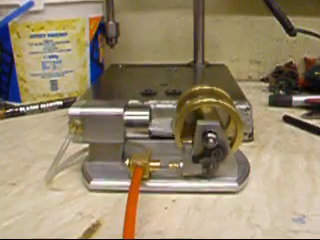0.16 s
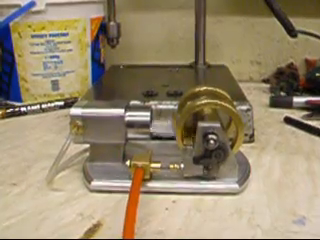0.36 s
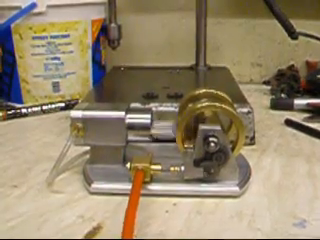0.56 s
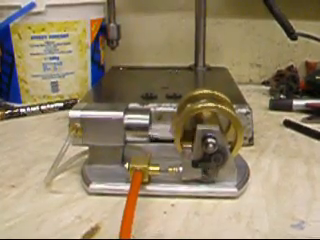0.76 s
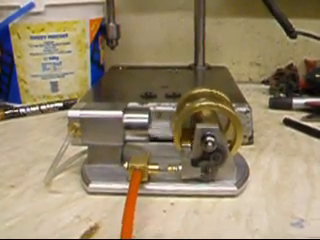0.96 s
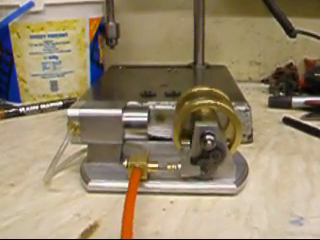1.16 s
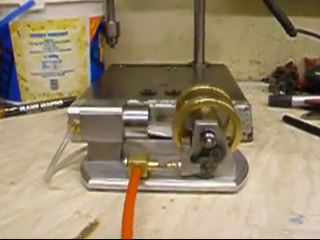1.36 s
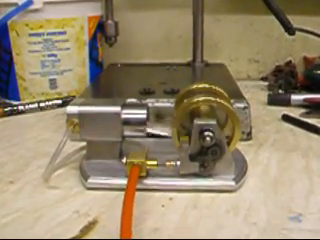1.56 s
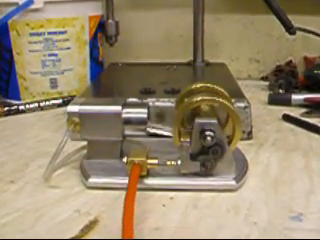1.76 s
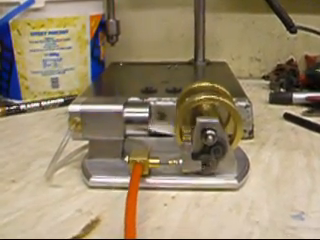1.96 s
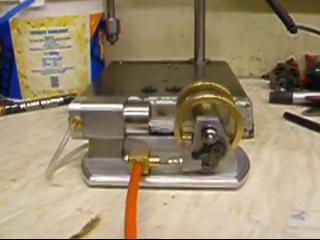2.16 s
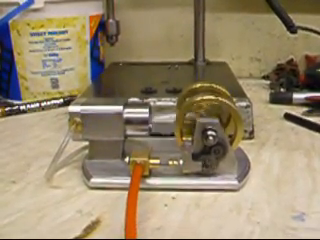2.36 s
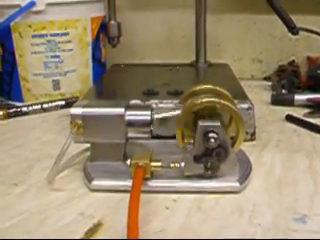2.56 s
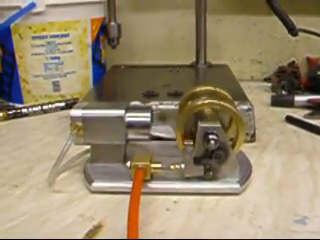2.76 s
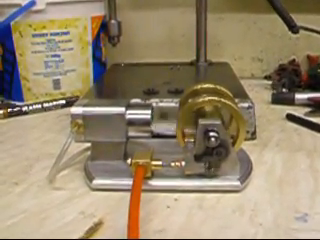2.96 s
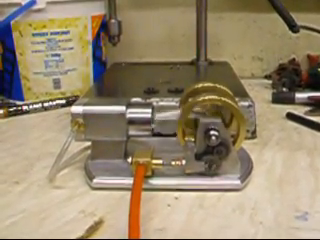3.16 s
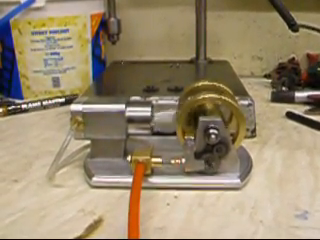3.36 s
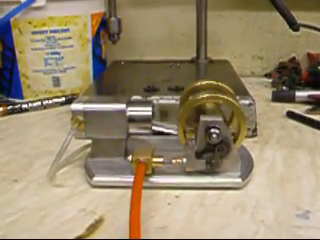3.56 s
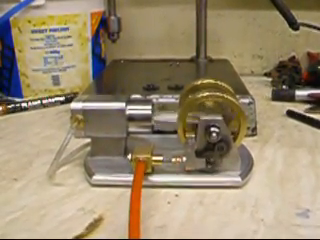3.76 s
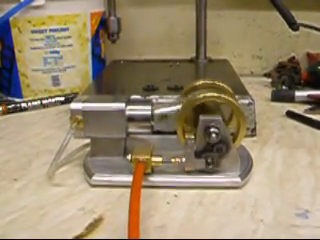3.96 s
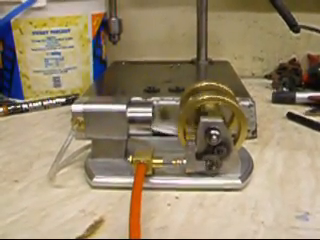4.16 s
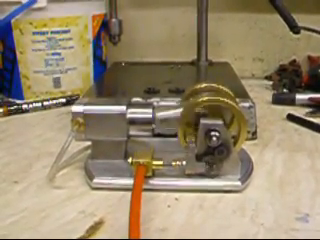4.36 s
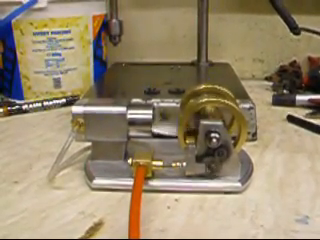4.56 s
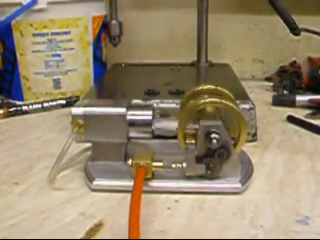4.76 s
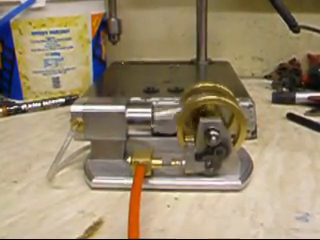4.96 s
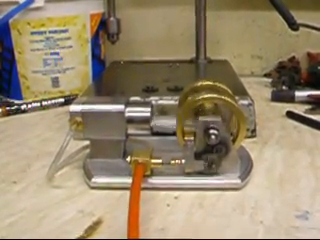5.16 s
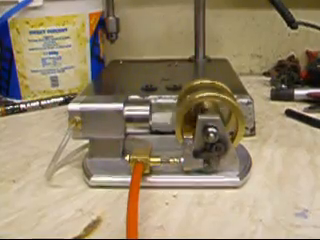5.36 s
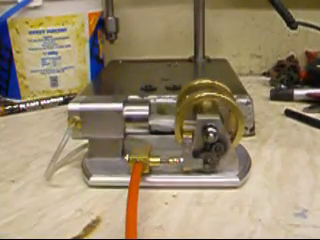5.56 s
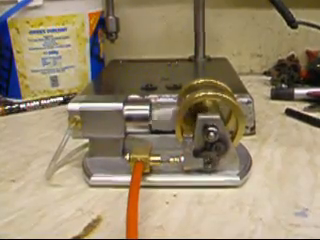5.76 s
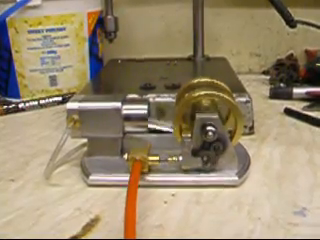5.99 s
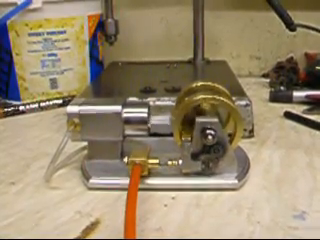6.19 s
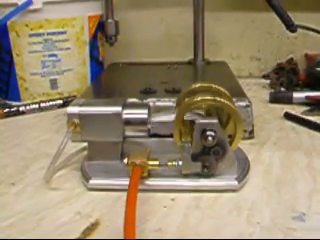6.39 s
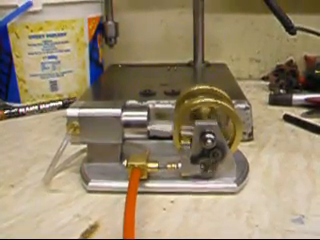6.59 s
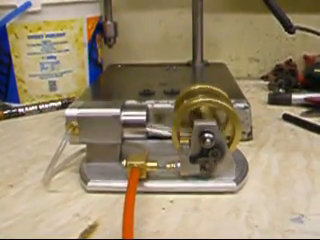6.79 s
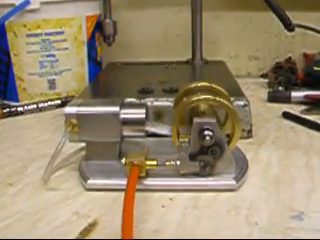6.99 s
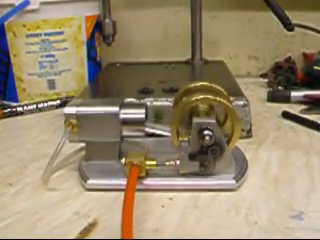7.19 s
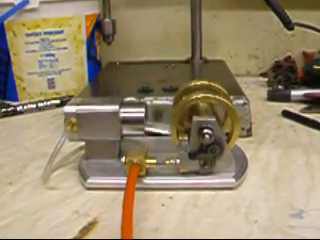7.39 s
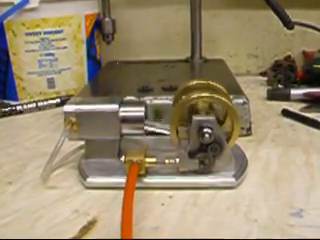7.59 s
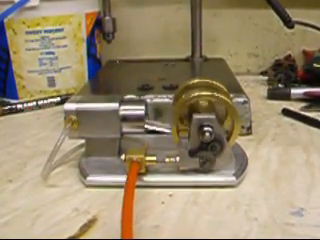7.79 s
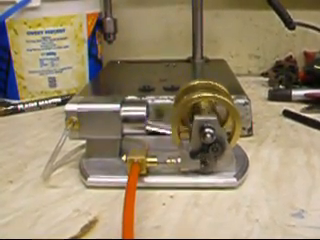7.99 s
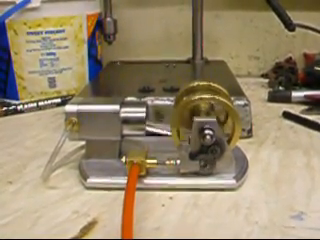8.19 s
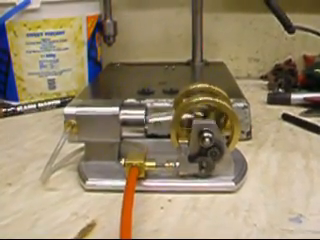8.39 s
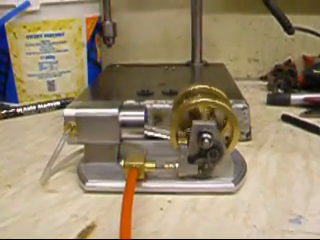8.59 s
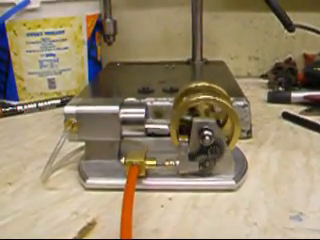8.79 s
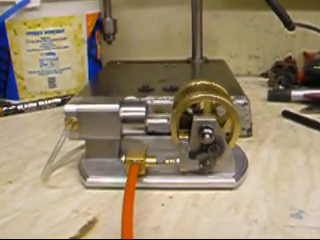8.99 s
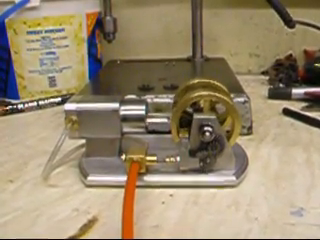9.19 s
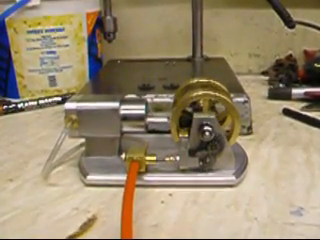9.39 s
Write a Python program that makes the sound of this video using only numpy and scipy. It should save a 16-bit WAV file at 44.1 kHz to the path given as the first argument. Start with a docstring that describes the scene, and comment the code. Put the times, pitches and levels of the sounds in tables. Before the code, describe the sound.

Close to the microphone, a little air-powered engine chuffs in a quick, regular train of crisp puffs with a short workshop echo. The piston slides softly between beats and the valve adds tiny chirps. The puffs grow slower, longer and slightly hollower as the flywheel winds down, then cease. Only the steady, faint hiss of leaking air remains, with quiet room rumble and a barely audible hum.

```python
"""On a workshop bench, a small single-cylinder model engine runs on compressed air, slows down and stops.
Once a turn the valve dumps the cylinder through a resonant exhaust tube: a sharp, spitting puff,
often closed by a tiny squeak. Between puffs the piston swishes in its bore. A small leak hisses
throughout, over a low murmur and a faint mains hum, and carries on after the flywheel has stopped."""
import sys
import numpy as np
from scipy import signal
from scipy.fft import rfft, irfft, next_fast_len
from scipy.io import wavfile
from scipy.ndimage import map_coordinates

SR = 44100
rng = np.random.default_rng(int(sys.argv[2]) if len(sys.argv) > 2 else 0)


def waveform_to_disk(signal):
    """Save audio, clipped to [-1, 1], as 16-bit WAV at the path in sys.argv[1]."""
    frames = np.transpose(np.atleast_2d(signal))
    scaled = np.clip(frames, -1, 1) * 32767
    samples = np.round(scaled).astype(np.int16)
    wavfile.write(sys.argv[1], SR, samples)


N = 416304

# Exhaust puffs, one a turn, each a burst on top of a steady flow: start_s, flow_db, burst_db
PUFFS = [(0.0851, -26, 6), (0.2832, -22.5, -0.1), (0.4831, -25, 5.5), (0.6829, -23, 0.2), (0.8842, -27, 6),
         (1.0846, -21, 0.5), (1.2907, -24.5, 5), (1.4964, -21.9, 1.2), (1.6991, -25, 7.5),
         (1.9075, -22, 3.0), (2.1174, -27.5, 8), (2.335, -23.0, 1.5), (2.5548, -24, 3.1), (2.7875, -25, 5),
         (3.0152, -25, 4.2), (3.2436, -22, 0.2), (3.4746, -24, 3), (3.7157, -25, 4.5), (3.9526, -25, 4),
         (4.2025, -25, 5), (4.4465, -24.5, 4.5), (4.7007, -24.1, 2), (4.9512, -25.5, 6.5),
         (5.2158, -23.5, 3), (5.479, -24.5, 4.5), (5.7542, -22.5, 3.0), (6.0194, -26, 7),
         (6.3166, -24, 1.1), (6.6324, -27, 5.5), (7.0085, -23, 1), (7.3834, -27, 6.5), (7.7926, -24, 4),
         (8.1724, -28.5, 9.5)]
OPEN_S, TURN_S = .0531, .25  # the valve stays open OPEN_S in a turn lasting TURN_S


def amp(db):
    """Decibels to gain."""
    return 10 ** (np.asarray(db) / 20)


def unit(x):
    """Scaled to rms 1."""
    return x / np.sqrt(np.mean(x ** 2) + 1e-20)


def along(points, hz):
    """A curve through (frequency, value) points on a log frequency axis."""
    f, v = np.transpose(points)
    return np.interp(np.log(hz + 1), np.log(f + 1), v)


def peaks(resonances, hz):
    """The boost in dB that resonances add to a colour."""
    return sum(db / (1 + (2 * (hz - centre) / width) ** 2) for centre, width, db in resonances)


def filtered(x, response):
    """x equalised by a gain curve over frequency."""
    size = next_fast_len(N + SR // 2)
    return irfft(rfft(x, size) * response(np.fft.rfftfreq(size, 1 / SR)), size)[:N]


def noise(colour, resonances=()):
    """Coloured noise of rms 1."""
    white = rng.standard_normal(N)
    return unit(filtered(white, lambda hz: amp(along(colour, hz) + peaks(resonances, hz))))


def wobble(rate):
    """A smooth random curve, rate knots a second."""
    return map_coordinates(rng.standard_normal(int(N * rate / SR) + 4), [np.arange(N) * rate / SR])


def ringing(colour_db, size=8192):
    """Minimum-phase impulse response of energy 1 with the given colour."""
    cepstrum = irfft(np.log(amp(colour_db(np.fft.rfftfreq(size, 1 / SR)))))
    cepstrum[1:size // 2] *= 2
    cepstrum[size // 2 + 1:] = 0
    response = irfft(np.exp(rfft(cepstrum)))
    return response / np.linalg.norm(response)


def add(track, at_s, sound):
    """Mixes a sound into a track."""
    at = round(at_s * SR)
    track[at:at + len(sound)] += sound[:len(track) - at]


def valve_times(slow_power=.745):
    """When the valve opens and for how many seconds: longer as the flywheel slows."""
    starts = np.array(PUFFS)[:, 0]
    return starts, OPEN_S * (np.gradient(starts) / TURN_S) ** slow_power


def latest_puff():
    """For every sample: the number of the latest puff, and the seconds since its valve opened."""
    starts, t = np.array(PUFFS)[:, 0], np.arange(N) / SR
    number = np.maximum(np.searchsorted(starts, t) - 1, 0)
    return number, np.maximum(t - starts[number], 0)


def leak(level_db=-51):
    """Air slips past the valve in a steady, faintly whistling hiss."""
    # Colour of the hiss: frequency_hz, level_db
    hiss_colour = [(300, -5), (1000, -6.5), (2000, -5), (2800, -5), (3400, -7), (4000, -4.5), (4400, -5.5),
                   (5200, -7), (8000, -8), (10000, -15.5), (12600, -20.5), (13400, -44)]
    # Narrow resonances of the leak: pitch_hz, width_hz, boost_db
    whistles = [(2235, 120, 5.5), (3434, 150, 9), (3670, 64, 5.5), (4570, 180, 6), (5550, 12, 9),
                (5850, 200, 3)]
    return amp(level_db) * noise(hiss_colour, whistles)


def room_tone(murmur_db=-61, hum_db=-73, hum_hz=60):
    """The low murmur of the workshop and a faint mains hum."""
    # Colour of the murmur: frequency_hz, level_db
    murmur_colour = [(20, 3.5), (35, -12), (70, -13), (130, -7), (250, -12), (600, -10.5), (1500, -13.5),
                     (4000, -49)]
    hum = np.sin(2 * np.pi * hum_hz * np.arange(N) / SR)
    return amp(murmur_db) * noise(murmur_colour) + amp(hum_db) * hum


def piston(speed_power=2.1):
    """The piston slides in its bore: swishes tied to the crank angle, fading as the flywheel slows."""
    # Swishes in the turn after the valve opens: phase_turns, width_turns, full_speed_db, bright_share
    strokes = [(.34, 0.047, -40.5, 0.68), (0.551, 0.063, -46.5, 0.05), (.845, 0.053, -45.5, 0.45)]
    # Colour of a dull swish: frequency_hz, level_db
    dull_colour = [(400, -46), (1500, -9), (3600, 5.5), (4600, 7), (5400, -20), (12000, -28)]
    # Colour of a bright swish: frequency_hz, level_db
    bright_colour = [(400, -31), (1500, 5.5), (3600, -8), (5200, 2.5), (8000, 2.5), (12500, -16),
                     (14000, -36)]
    starts, t = np.array(PUFFS)[:, 0], np.arange(N) / SR
    # the first turn is already under way; after the last puff the wheel creeps
    turn_starts = np.r_[2 * starts[0] - starts[1], starts, N / SR]
    turns = np.interp(t, turn_starts, np.arange(len(turn_starts)))
    speed = np.gradient(turns)
    dull, bright, swish = noise(dull_colour), noise(bright_colour), np.zeros(N)
    for phase, width, db, bright_share in strokes:
        stroke = amp(db) * np.exp(-((turns % 1 - phase) / width) ** 2 / 2)
        swish += stroke * (np.sqrt(bright_share) * bright + np.sqrt(1 - bright_share) * dull)
    return swish * (speed / speed.max()) ** speed_power


def airflow(burst_share=.28, rise_s=.00019, close_s=.0065, early_s=.0005,
            sag_db=-3, burst_trim_db=-1, seep_db=-20, seep_s=.0075):
    """Puff envelope: air seeps as the port cracks open, the cylinder dumps, the piston expels the rest."""
    flow = np.zeros(N)
    for (start, flow_db, burst_db), open_s in zip(PUFFS, valve_times()[1]):
        span = slice(max(int((start - .05) * SR), 0), int((start + .15) * SR))
        t = np.arange(N)[span] / SR - start
        age = np.maximum(t, 0)
        dump = np.exp(-(age / (burst_share * open_s)) ** 4)
        push_db = sag_db * (age / open_s - .5)
        level_db = flow_db + dump * (burst_db + burst_trim_db) + (1 - dump) * push_db
        opening = 1 - np.exp(-age / rise_s)
        closing = (1 - np.tanh((t - open_s + early_s) / close_s)) / 2
        seep = amp(flow_db + burst_db + seep_db) * np.exp(-abs(t) / seep_s)
        flow[span] += amp(level_db) * opening * closing + seep
    return flow


def spitting(opening_s=.001022, opening_db=3.5, later_count=2, later_db=4.5, fade_db=-4,
             scatter_db=2, first_share=.1, last_share=.75, crowding=1.6):
    """Spits as (start_s, level_db): one as the valve opens, then more, mostly while pressure is high."""
    spits = []
    for (start, flow_db, burst_db), open_s in zip(PUFFS, valve_times()[1]):
        levels = flow_db + burst_db + scatter_db * np.clip(rng.standard_normal(later_count + 1), -2, 1)
        shares = first_share + (last_share - first_share) * rng.random(later_count) ** crowding
        spits.append((start + opening_s, levels[0] + opening_db))
        spits += zip(start + shares * open_s, levels[1:] + later_db + fade_db * shares)
    return spits


def tube_db(hz, spacing_hz=445, ripple_db=2, above_hz=6000):
    """The jet's colour with the exhaust tube's resonances on it; the high ones are evenly spaced."""
    # Broad colour of the jet: frequency_hz, level_db
    jet_colour = [(60, -34.5), (140, -32.5), (230, -28), (550, -28.5), (850, -14), (1450, -18), (1900, -8),
                  (3400, -6.5), (4200, -13.5), (6500, -11), (9700, -16.5), (11500, -25.5), (12800, -20.5),
                  (14000, -42)]
    # Resonances of the tube and port: pitch_hz, width_hz, boost_db
    tube_modes = [(146, 34, 9.5), (338.4, 54, 10), (476, 57, 15.5), (637.6, 25, 11.5), (760, 120, 6),
                  (923, 43, 5.5), (1150, 230, 8), (1638, 120, 5), (1770, 80, 4), (2025, 88, 7.5),
                  (2177, 130, 2), (2580, 90, 7), (2826, 32, 6.5), (3085, 137, 6.5), (3187, 100, 5.5),
                  (3498, 220, 7.5), (3775, 410, 7), (4400, 110, 4.5), (4580, 190, 8), (5540, 170, 5.5),
                  (6310, 290, 5)]
    ripple = ripple_db * np.cos(2 * np.pi * hz / spacing_hz) * (hz > above_hz)
    return along(jet_colour, hz) + peaks(tube_modes, hz) + ripple


def exhaust(flow, spits, jet_db=-1.05, flutter_db=2, sputter_db=-9, sputter_per_s=400,
            crack_db=8, dull_hz=3000, brighten_s=.00029):
    """A turbulent jet with fine sputter and a crack for each spit, all sounding through the tube."""
    turbulence = unit(amp(flutter_db * wobble(500)) * rng.standard_normal(N))
    sputter = unit((rng.random(N) < sputter_per_s / SR) * rng.choice([-1, 1], N))
    jet = flow * (amp(jet_db) * turbulence + amp(sputter_db) * sputter)
    for start, db in spits:
        jet[round(start * SR)] += amp(db + crack_db)
    # each puff starts dull: the fine turbulence takes a moment to build up
    dull = filtered(jet, lambda hz: 1 / (1 + (hz / dull_hz) ** 4))
    brightness = 1 - np.exp(-latest_puff()[1] / brighten_s)
    return signal.fftconvolve(dull + (jet - dull) * brightness, ringing(tube_db))[:N]


def port_ring(spits, ring_hz=3280, scatter=.088, swell_s=.00051):
    """Each spit rings the exhaust port for a few cycles."""
    rings, t = np.zeros(N), np.arange(SR // 100) / SR
    swell = t / swell_s * np.exp(1 - t / swell_s)
    for (start, db), detune in zip(spits, rng.standard_normal(len(spits))):
        pitch_hz = ring_hz * np.exp(scatter * detune)
        add(rings, start, amp(db) * swell * np.sin(2 * np.pi * pitch_hz * t))
    return rings


def cylinder_note(flow, open_hz=560, shut_hz=260, glide_s=.032, width_hz=110,
                  scatter=.04, gain_db=-23, slow_power=1.1):
    """The cylinder cavity's hollow note sinks as the port narrows, most clearly in slow turns."""
    number, age = latest_puff()
    open_s = valve_times()[1]
    narrowed = 1 - np.exp(-age / glide_s)
    detune = np.exp(scatter * rng.standard_normal(len(PUFFS)))[number]
    pitch_hz = detune * (open_hz + (shut_hz - open_hz) * narrowed)
    phase = 2 * np.pi * np.cumsum(pitch_hz) / SR
    breathy_note = wobble(width_hz) * np.cos(phase) + wobble(width_hz) * np.sin(phase)
    slowness = (open_s / open_s.max())[number] ** slow_power
    return amp(gain_db) * flow * narrowed * slowness * breathy_note


def valve_thump(thump_hz=148, gain_db=-52, width_s=.012, early_s=.0022, scatter=.11, slow_power=1.3):
    """The air column in the tube bounces softly as the valve shuts, harder after a long puff."""
    thumps, t = np.zeros(N), np.arange(-SR // 20, SR // 20) / SR
    envelope = np.exp(-(t / width_s) ** 2)
    for start, open_s, (detune, phase) in zip(*valve_times(), rng.standard_normal((len(PUFFS), 2))):
        pitch_hz = thump_hz * np.exp(scatter * detune)
        bounce = (open_s / OPEN_S) ** slow_power * np.sin(2 * np.pi * (pitch_hz * t + phase))
        add(thumps, start + open_s - early_s + t[0], envelope * bounce)
    return amp(gain_db) * thumps


def squeaks(squeak_hz=2340, level_db=-25.5, scatter_db=3, width_s=.0011, early_s=.002, scatter=.027):
    """The last air squeezes through the closing port with a tiny chirp, clearer in some turns."""
    chirps, t = np.zeros(N), np.arange(-SR // 100, SR // 100) / SR
    envelope = np.exp(-(t / width_s) ** 2)
    for start, open_s, (detune, strength) in zip(*valve_times(), rng.standard_normal((len(PUFFS), 2))):
        pitch_hz = squeak_hz * np.exp(scatter * detune)
        chirp = envelope * np.sin(2 * np.pi * pitch_hz * t)
        add(chirps, start + open_s - early_s + t[0], amp(level_db + scatter_db * strength) * chirp)
    return chirps


def squeal(peak_s=6.689, pitch_hz=3780, level_db=-23.5, width_s=.0035, rise_hz_per_s=60000):
    """In one slow turn, a brief whistle climbs as the port narrows."""
    t = np.arange(N) / SR - peak_s
    phase = 2 * np.pi * (pitch_hz + rise_hz_per_s * t / 2) * t
    return amp(level_db) * np.exp(-(t / width_s) ** 2) * np.sin(phase)


def workshop_reverb(x, delay_s=.004):
    """A short room tail, a little different for every puff; the treble dies first."""
    # Time the room takes to fall by 60 dB: frequency_hz, decay_s
    decay_times = [(150, 0.42), (1000, 0.39), (3000, 0.23), (7000, 0.22), (13000, 0.27)]
    wet, number = np.zeros(N), latest_puff()[0]
    for puff in range(len(PUFFS)):
        span = np.flatnonzero(number == puff)
        hz, t, bands = signal.stft(rng.standard_normal(SR // 2), SR, nperseg=256)
        decay = amp(-60 * t / along(decay_times, hz)[:, None])
        tail = signal.istft(bands * decay, SR, nperseg=256)[1]
        add(wet, span[0] / SR + delay_s, signal.fftconvolve(x[span], tail / np.linalg.norm(tail)))
    return wet


def scene(reverb_db=-11):
    """The engine close up, the workshop behind it, in mono."""
    flow, spits = airflow(), spitting()
    puffs = exhaust(flow, spits) + port_ring(spits) + cylinder_note(flow)
    engine = puffs + squeaks() + squeal() + valve_thump() + piston()
    return (engine + amp(reverb_db) * workshop_reverb(engine) + leak() + room_tone())[None]


def record(dry, cutoff_hz=16000, dc_offset=.0035):
    """Shelves down the highest treble, cuts it above the band limit and adds a small constant offset."""
    shelf = [(13800, 0), (14500, -18)]  # frequency_hz, gain_db
    return filtered(dry[0], lambda hz: (hz < cutoff_hz) * amp(along(shelf, hz)))[None] + dc_offset


dry = scene()
out = record(dry)
waveform_to_disk(out)
```